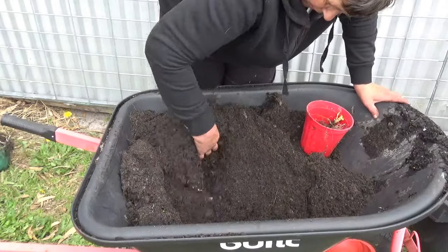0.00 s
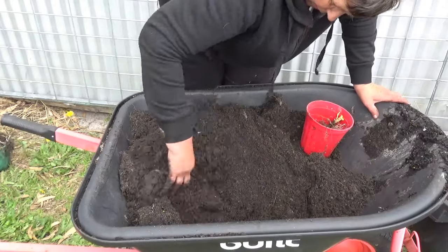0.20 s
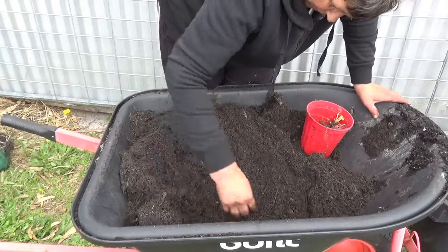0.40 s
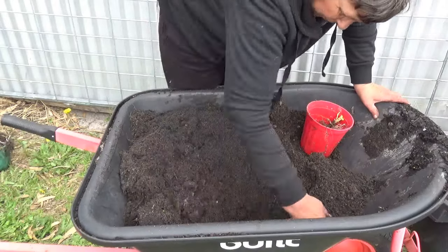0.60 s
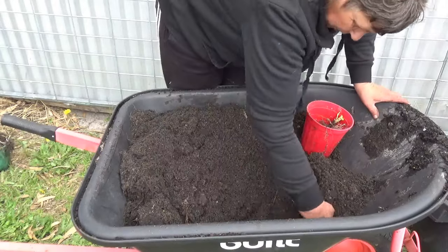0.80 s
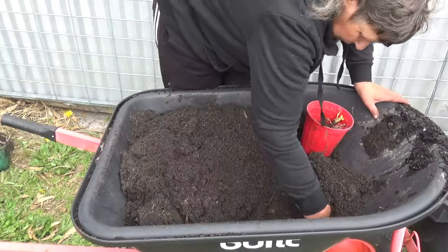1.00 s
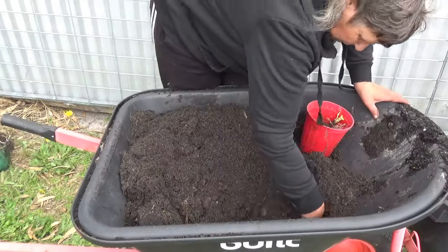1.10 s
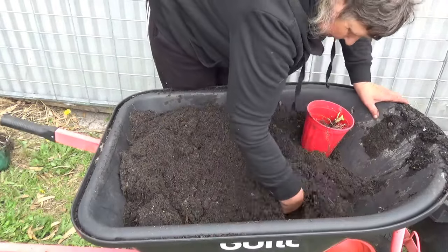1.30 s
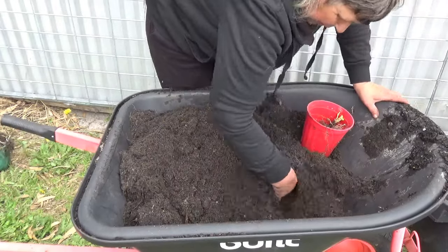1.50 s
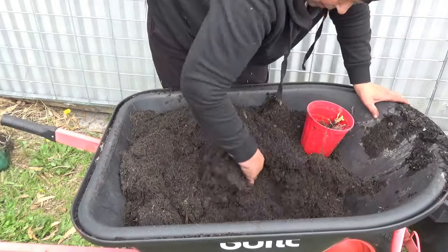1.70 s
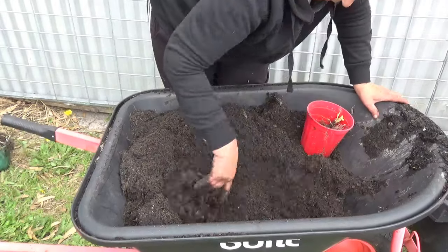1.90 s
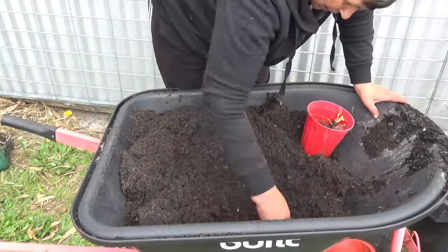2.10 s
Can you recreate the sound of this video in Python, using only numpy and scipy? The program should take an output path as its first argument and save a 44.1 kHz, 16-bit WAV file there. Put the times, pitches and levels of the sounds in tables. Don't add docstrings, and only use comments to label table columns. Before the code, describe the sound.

A hand sweeps softly through crumbly potting mix in a plastic wheelbarrow tub; grit ticks, a twig snaps loudly, then a stronger sweep hisses while songbirds whistle across an open yard, close stereo microphone.

```python
import sys
import numpy as np
from scipy import signal
from scipy.io import wavfile

SR = 44100
rng = np.random.default_rng(int(sys.argv[2]) if len(sys.argv) > 2 else 0)


def volts_from_db(level):
    exponent = np.asarray(level, float) / 20
    return 10 ** exponent


def master(y):
    cut = np.clip(np.atleast_2d(y).T, -1, 1)
    pcm = np.round(cut * 32767)
    wavfile.write(sys.argv[1], SR, pcm.astype(np.int16))


N = 97020


def rms_one(x):
    return x / np.sqrt(np.mean(x ** 2) + 1e-20)


def in_time(rows):
    s, *columns = np.transpose(rows)
    return [np.interp(np.arange(N) / SR, s, column) for column in columns]


def at_hz(points, hz):
    point_hz, value = np.transpose(points)
    return np.interp(np.log(hz), np.log(point_hz), value)


def drift(rate_hz):
    pole = np.exp(-80 * np.pi * rate_hz / SR)
    white = rng.standard_normal(N // 40 + 2002)
    slow = signal.lfilter([1], [1, -2 * pole, pole * pole], white)[2000:]
    return np.interp(np.arange(N) / 40, np.arange(len(slow)), rms_one(slow))


def ring(clicks, hz, t60):
    pole, turn = volts_from_db(-60 / (t60 * SR)), 2 * np.pi * hz / SR
    resonance = [1, -2 * pole * np.cos(turn), pole * pole]
    return signal.lfilter([.5, 0, -.5], resonance, clicks + 1e-18) * 2


def bandpass(x, order, low_hz, high_hz):
    return signal.sosfilt(signal.butter(order, [low_hz, high_hz], "band", fs=SR, output="sos"), x)


def pan(x, db):
    return x * volts_from_db(np.array([[db / 2], [-db / 2]]))


def banded(source, spectrum, patchy_db):
    # f/Hz, likeness [0..1]
    likeness = [(60, 0.97), (170, 0.94), (490, 0.9), (1410, 0.5), (4060, 0.74), (11600, 1)]
    edges = 22 * 2 ** np.arange(0, 9.6, .5)
    together = drift(6)
    out = 0
    for k, (low, high) in enumerate(zip(edges, edges[1:])):
        hz = np.sqrt(low * high)
        if spectrum[0][0] * .7 < hz < spectrum[-1][0] * 1.3:
            mid, side = bandpass(source[k % 2], 2, low, high)
            alike = np.clip(at_hz(likeness, hz), 0, 1)
            flicker_db = patchy_db * (0.68 * together + drift(15.2))
            gain = volts_from_db(at_hz(spectrum, hz) + flicker_db)
            out = out + gain * (np.sqrt(1 + alike) * mid + np.sqrt(1 - alike) * side * [[1], [-1]])
    return rms_one(out)


def grains(per_s, spread_db):
    shape = (2, 2, N)
    hits = rng.random(shape) < per_s / SR
    size = volts_from_db(spread_db * np.minimum(rng.exponential(1, shape), 5))
    return hits * size * rng.choice([-1, 1], shape)


def soil():
    # t/s, crumb hiss level/dB, dull push level/dB
    hand = [(0, -63, -63), (.3, -62.5, -61), (.35, -58.5, -52.5), (.42, -59.5, -56.5), (.47, -61, -56.5),
            (.69, -66.5, -64), (.75, -48, -49), (.86, -49, -51), (.93, -49.5, -53.5), (.97, -56.5, -52),
            (1.03, -57.5, -53.5), (1.2, -59, -54.5), (1.45, -58.5, -56.5), (1.7, -66.5, -61),
            (2.03, -65.5, -64), (2.1, -60.5, -55), (2.2, -56.5, -55)]
    # f/Hz, level/dB per Hz
    crumbs = [(1470, -25), (2500, -5.5), (3290, -15.5), (4980, -8.5), (10300, -14), (11300, -16),
              (11500, -38), (15000, -68), (22000, -120)]
    # f/Hz, level/dB per Hz
    push_colour = [(90, -26), (170, -11.5), (450, -4.5), (1000, -3.5), (1800, -4.5), (3500, -8)]
    hiss_db, push_db = in_time(hand)
    hiss = volts_from_db(hiss_db) * banded(grains(4500, spread_db=2), crumbs, patchy_db=1.33)
    push = volts_from_db(push_db) * banded(grains(2500, spread_db=1.5), push_colour, patchy_db=1.5)
    return pan(hiss, -1.5) + push


def ticks():
    # t/s, peak level/dB, f/Hz, ring/s
    grit = [(.3425, -39.5, 1510, 0.0023), (.356, -37, 5470, .004), (.411, -44.5, 564, 0.012),
            (.752, -45, 565, 0.045), (.3655, -29, 5460, 0.0042), (.392, -44.5, 870, 0.013),
            (.391, -34, 4870, 0.0037), (0.3938, -36.5, 5370, 0.0017), (.4035, -41, 8600, .002),
            (.435, -41, 6960, .002), (1.121, -41, 9450, 0.0029), (2.0639, -27.5, 9800, 0.0058),
            (2.0641, -43, 1330, 0.0086), (2.075, -35, 8550, 0.0042), (2.1005, -37, 9040, .002),
            (2.107, -39, 7150, 0.007), (2.1145, -36.5, 960, 0.025), (2.1145, -40, 1900, 0.0085),
            (2.115, -47, 420, 0.013), (2.142, -43.5, 1000, .02), (2.19, -40, 2400, .006),
            (2.1138, -38, 4300, 0.0087), (2.1375, -40.5, 1410, 0.0067), (2.181, -51.5, 464, 0.033),
            (2.187, -36.5, 7960, 0.0018)]
    out, t = np.zeros(N + SR), np.arange(1024) / SR
    for s, db, hz, ring_s in grit:
        strike = rng.standard_normal(1024) + 8.3 * (t == 0)
        dying = strike * volts_from_db(-60 * t / (2.07 * ring_s))
        burst = bandpass(dying, 2, hz / 1.38, min(hz * 1.33, 10300))
        out[int(s * SR):][:1024] += volts_from_db(db) * burst / np.abs(burst).max()
    return out[:N]


def snap():
    # t/s, peak level/dB
    cracks = [(.5188, -18), (.5192, -10.5), (.5199, -22), (.5212, -21), (.5225, -21), (.5229, -25),
              (.5254, -29), (.5262, -26), (.5268, -26), (.5276, -27), (.5285, -29), (.5295, -30),
              (.5315, -34), (.534, -34)]
    # f/Hz, level/dB, t60/s
    modes = [(613, -31.5, 0.024), (870, -35, 0.027), (1650, -19, 0.0063), (2390, -16.5, 0.0056),
             (3100, -7, 0.0037), (4170, -7, 0.0023), (6260, -14.5, 0.0044), (8360, -17, 0.0043),
             (9400, -38, 0.0051)]
    debris_db, debris_t60_s = -39.5, 0.14
    s, db = np.transpose(cracks)
    main = np.arange(len(s)) == 1
    ringing = 0
    for hz, level_db, t60 in modes:
        luck = rng.normal(0, 1, len(s))
        clicks = np.zeros(N)
        clicks[(s * SR).astype(int)] = volts_from_db(db + level_db - 3.5) * np.where(main, 1, luck)
        ringing = ringing + ring(clicks, hz, t60)
    ringing = bandpass(ringing, 2, 483, 9800)
    since = np.arange(N) / SR - s[1]
    scatter = bandpass(rng.standard_normal(N), 1, 1500, 8000)
    fade = volts_from_db(debris_db - 60 * np.abs(since) / debris_t60_s) * (since > 0)
    return ringing + fade * scatter


def rubs():
    # start t/s, length/s, rate/Hz, level/dB
    judders = [
        (0.852, .03, 70, -57.5),
        (.795, 0.088, 73, -56.5),
        (.128, .055, 100, -58.5),
        (0.7, .045, 44.7, -64.5),
        (1.345, .09, 96, -63.5),
        (1.02, .07, 80, -65),
        (.328, .05, 60, -58.5),
    ]
    # f/Hz, t60/s
    walls = [
        [(1350, 0.035), (1450, 0.045)],
        [(1285, 0.046), (1380, 0.052), (1560, 0.023)],
        [(1850, 0.018), (2250, 0.025)],
        [(198, 0.071)],
        [(800, 0.025), (1030, 0.031)],
        [(990, 0.06)],
        [(620, 0.037)],
    ]
    out = 0
    for (s, length, rate, db), wall in zip(judders, walls):
        timing, strength = rng.normal(0, 1, (2, 16))
        at = (np.arange(16) + 0.2004 * timing + 0.314) / rate
        inside = at < length
        clicks = np.zeros(N)
        clicks[((s + at[inside]) * SR).astype(int)] = volts_from_db(db + 2 * strength[inside])
        for hz, t60 in wall:
            soft_contact = ring(clicks, hz, 7.1 / hz)
            out = out + ring(soft_contact, hz, t60) * hz / 25000
    return out


def whistle(hz, db, start, length):
    since = np.arange(N) / SR - start
    edge = np.clip(np.minimum(since, length - since) / .01, 0, 1)
    tone = np.sin(2 * np.pi * np.cumsum(hz) / SR)
    return np.sqrt(2) * volts_from_db(db) * np.sin(edge * np.pi / 2) ** 2 * tone


def yard(near):
    t60_s, wall_s, wall_spread_s, width = .6, 0.153, 0.0097, 0.43
    lag = np.arange(SR // 2) / SR
    scatter = volts_from_db(-60 * lag / t60_s) * (lag > .01)
    wall = np.exp(-.5 * ((lag - wall_s) / wall_spread_s) ** 2)
    shape = volts_from_db(-14) * scatter / np.linalg.norm(scatter) + volts_from_db(-15.5) * wall / np.linalg.norm(wall)
    mid, side = rng.standard_normal((2, len(lag))) * shape
    response = np.array([mid + width * side, mid - width * side])
    return signal.fftconvolve(near[None], response, axes=1)[:, :N]


def songbirds():
    # t/s, f/Hz, level/dB
    whistles = [
        [(.392, 2340, -52), (.406, 2212, -42.5), (.424, 2025, -44.5), (.46, 1965, -46), (.49, 1923, -43.5),
         (.56, 1900, -46.5), (.6, 1865, -53.5), (.63, 1833, -49), (.66, 1780, -60)],
        [(.758, 2128, -52), (.785, 2275, -46.5), (.815, 2240, -42.5), (.844, 2184, -38), (.865, 2133, -43.5),
         (.89, 2080, -52), (.92, 2040, -42), (.95, 1970, -50)],
        [(.318, 3157, -69), (.34, 3100, -51.5), (.388, 3100, -48.5), (.398, 2970, -48.5), (.412, 2750, -56)],
    ]
    # start t/s, length/s, first f/Hz, last f/Hz,
    # level/dB
    notes = [(.055, .052, 1885, 1850, -57), (.178, .08, 2230, 2160, -45.5), (.25, .055, 2530, 2580, -63),
             (.24, .055, 2660, 2790, -66), (.275, .025, 3560, 3500, -62), (.385, .07, 3095, 3095, -61),
             (.468, .03, 3510, 3490, -60), (.67, .102, 1900, 1842, -54), (.75, .055, 3140, 3440, -52.5),
             (.555, .04, 2130, 1990, -56), (.6, .05, 1985, 1925, -54), (.905, .035, 2170, 2200, -56),
             (.945, .035, 2180, 2200, -55), (.95, .03, 2030, 2020, -58), (1.0, .04, 2130, 2160, -48.5),
             (1.012, .07, 1730, 1570, -54), (1.05, .055, 2060, 2035, -54), (1.075, .04, 1560, 1600, -54),
             (1.12, .04, 1580, 1550, -57), (1.43, .15, 2160, 2030, -65), (1.747, .04, 690, 680, -60),
             (1.805, .05, 2140, 2210, -58), (1.868, .048, 2150, 2240, -59), (1.92, .055, 2200, 2240, -66),
             (1.975, .045, 4600, 4550, -68), (2.135, .025, 4330, 4400, -61), (2.152, .045, 4750, 4950, -63),
             (2.165, .025, 4350, 4330, -67)]
    near = 0
    for path in whistles:
        start, end = path[0][0], path[-1][0]
        near = near + whistle(*in_time(path), start, end - start)
    for s, length, first_hz, last_hz, db in notes:
        glide = np.interp(np.arange(N) / SR, [s, s + length], [first_hz, last_hz])
        near = near + whistle(glide, db + 1.5 * drift(26), s, length)
    return pan(near, -1.6) + yard(near)


def rasp():
    # t/s, f/Hz, level/dB
    strands = [
        [(1.275, 2595, -66), (1.295, 3300, -57), (1.31, 3550, -52), (1.335, 3850, -58), (1.35, 4050, -68)],
        [(1.298, 4020, -60), (1.315, 4250, -52.5), (1.335, 4430, -52), (1.352, 4600, -51.5),
         (1.368, 4450, -59.5), (1.425, 4400, -75)],
        [(1.3, 5000, -63), (1.315, 5250, -57), (1.35, 5300, -62), (1.36, 5330, -68)],
    ]
    width_hz, beats_hz = 230, 260
    t, out = np.arange(N) / SR, 0
    narrow = signal.butter(2, width_hz, fs=SR, output="sos")
    throb = 1 + .5 * np.sin(2 * np.pi * beats_hz * t)
    for strand in strands:
        hz, db = in_time(strand)
        rough = signal.sosfilt(narrow, rng.standard_normal((2, N)))
        phase = 2 * np.pi * np.cumsum(hz) / SR
        band = rms_one(rough[0] * np.cos(phase) + rough[1] * np.sin(phase)) * throb
        sounding = (t > strand[0][0]) & (t < strand[-1][0])
        out = out + volts_from_db(db) * band * sounding
    return pan(out, 8.5)


def distant_air():
    # f/Hz, level/dB per Hz
    air_colour = [(15, -44), (25, -9.5), (123, -15), (399, -4.5), (907, -2), (1030, -3.5), (4570, -6),
                  (10600, -20), (11500, -34), (15000, -65), (22000, -120)]
    return volts_from_db(-55.5) * banded(rng.standard_normal((2, 2, N)), air_colour, patchy_db=1.59)


def scene():
    hand = soil() + pan(ticks(), 1.0) + pan(snap(), 2.4) + pan(rubs(), -0.88)
    return hand + songbirds() + rasp() + distant_air()


def low_pass(x):
    return signal.sosfilt(signal.butter(12, 12230, fs=SR, output="sos"), x)


def record(dry):
    cut = signal.sosfilt(signal.cheby2(20, 40, 11250, fs=SR, output="sos"), dry)
    mix = signal.sosfilt(signal.butter(3, 38, "high", fs=SR, output="sos"), cut)
    return low_pass(mix)


dry = scene()
out = record(dry)
master(out)
```